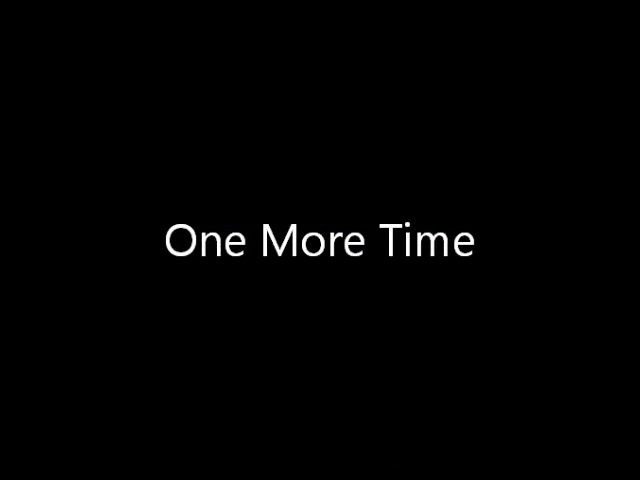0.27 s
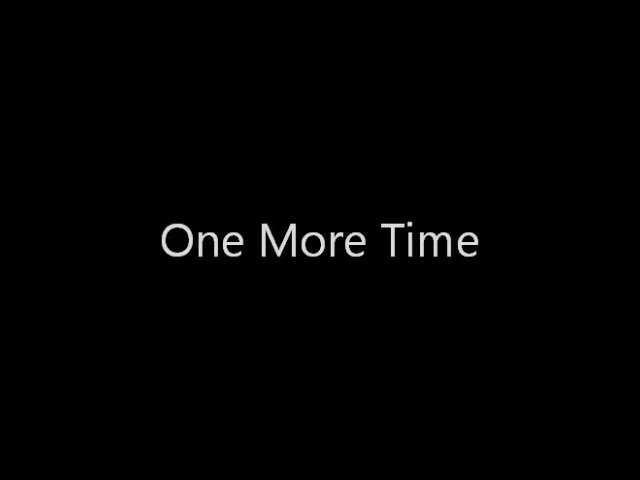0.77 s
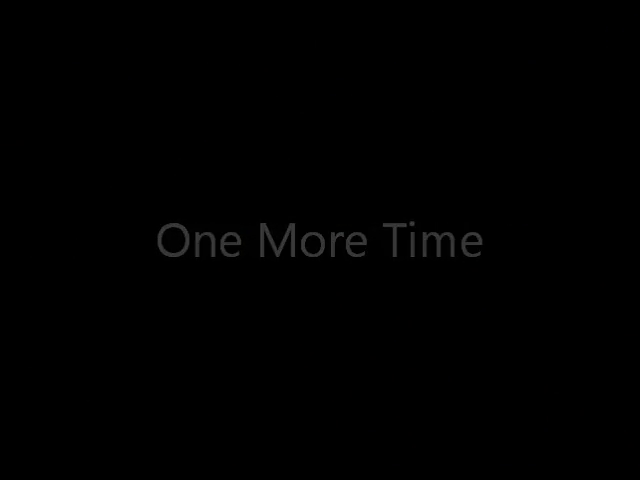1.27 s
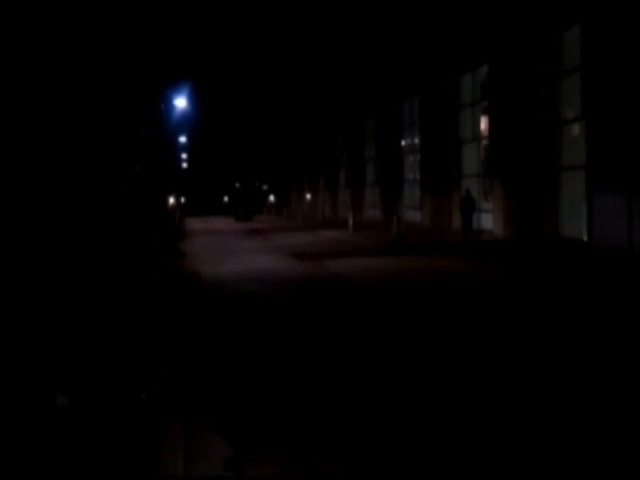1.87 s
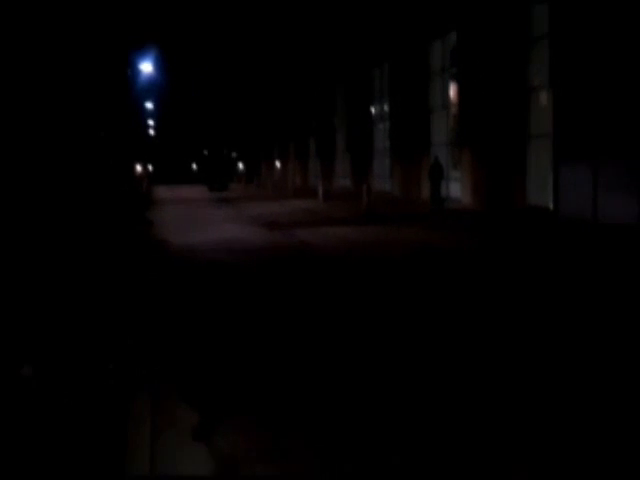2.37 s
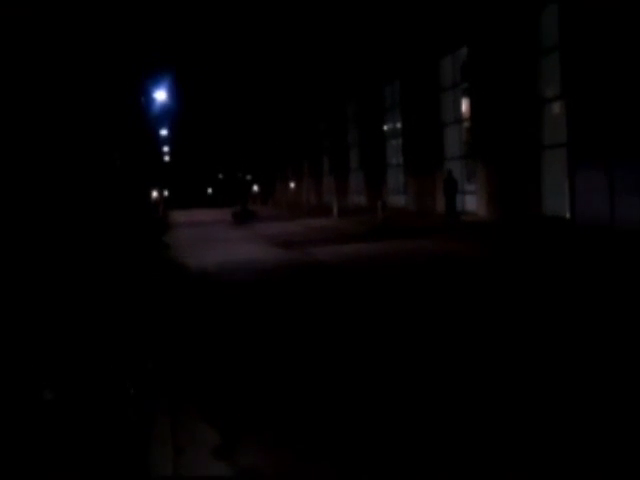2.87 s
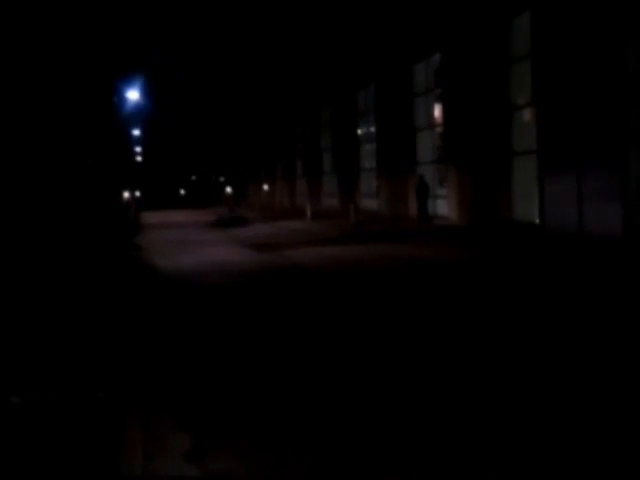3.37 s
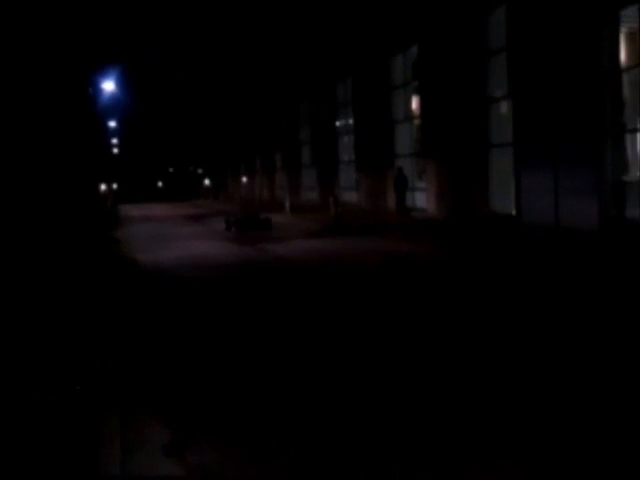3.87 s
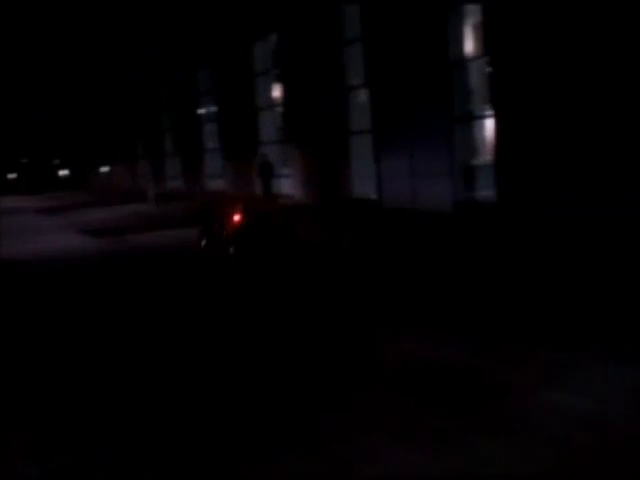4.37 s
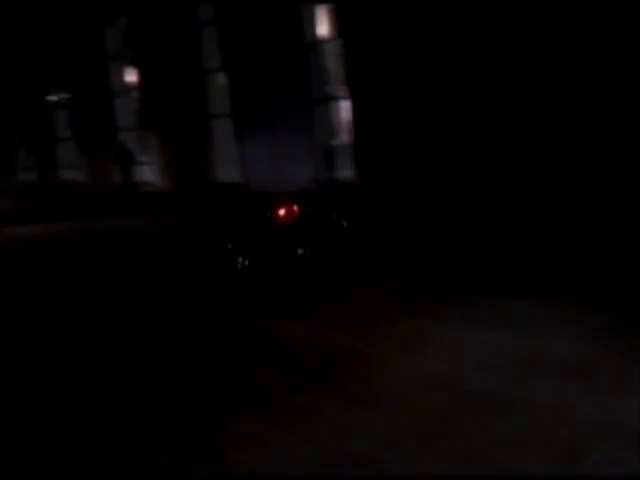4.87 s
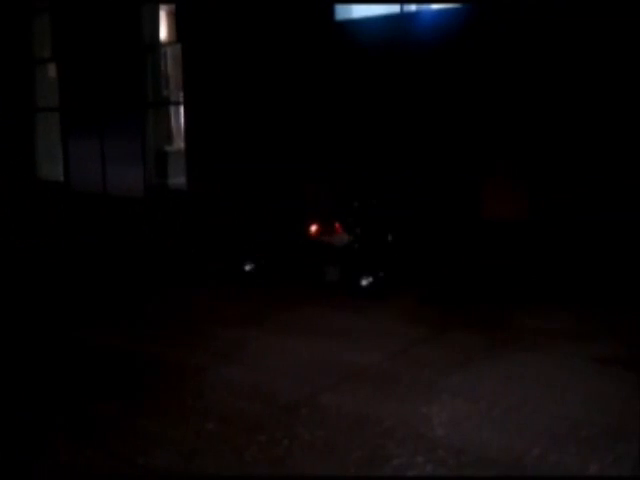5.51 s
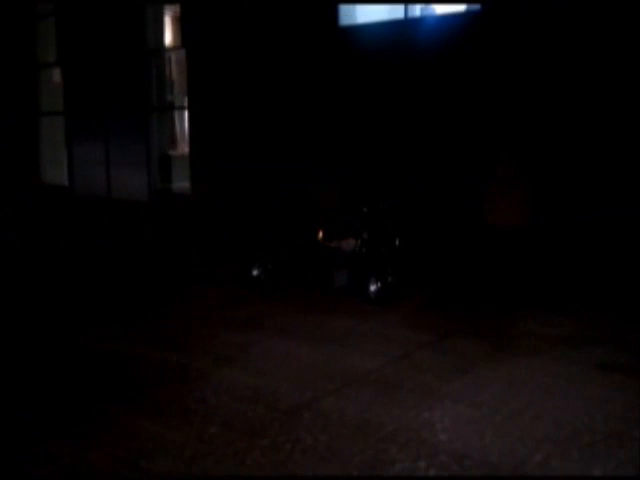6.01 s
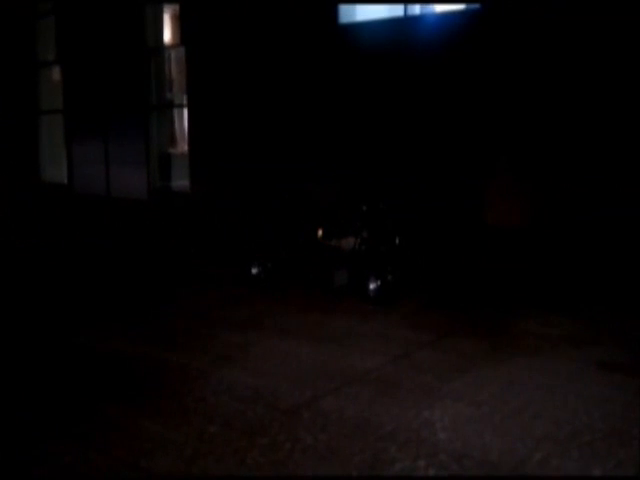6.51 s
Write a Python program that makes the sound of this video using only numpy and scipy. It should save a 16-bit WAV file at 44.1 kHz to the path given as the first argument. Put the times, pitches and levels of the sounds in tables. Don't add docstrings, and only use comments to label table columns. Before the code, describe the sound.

Outdoors between hard walls, one car engine comes nearer, its steady hum rising in pitch and roughness. Loud ragged exhaust and intake roar peak mid-scene, clipping the microphone, with three quick rev surges. Then it comes off throttle, turning side-on, deeper and clattery, briefly blipping. Near the end a tiny metal tick, a last soft rev, and distant traffic wash.

```python
import sys
import numpy as np
from scipy import signal
from scipy.fft import rfft, irfft
from scipy.io import wavfile
from scipy.ndimage import uniform_filter1d, map_coordinates

SR = 44100
rng = np.random.default_rng(int(sys.argv[2]) if len(sys.argv) > 2 else 0)


def generate_wav(signal):
    frames = np.transpose(np.atleast_2d(signal))
    scaled = np.clip(frames, -1, 1) * 32767
    pcm = np.round(scaled).astype(np.int16)
    wavfile.write(sys.argv[1], SR, pcm)


def decibels_to_gain(level_db):
    exponent = np.asarray(level_db, float) / 20
    return 10 ** exponent


N = 297630

# freq_hz, level_db
PIPE_RESONANCE = [(140, -30), (230, -4), (290, -3), (335, -2.5), (388, -0.5), (423, -5), (461, -17),
                  (836, -10.5), (1300, -39.5), (1690, -46), (2860, -120)]


def unit(x):
    return x / np.sqrt(np.mean(x ** 2) + 1e-20)


def along(points, hz):
    freq_hz, value = np.transpose(points)
    return np.interp(np.log(hz + 1), np.log(freq_hz + 1), value)


def curves(rows):
    time_s, *columns = np.transpose(rows)
    return [np.interp(np.arange(N) / SR, time_s, column) for column in columns]


def wobble(rate_hz):
    knots = rng.standard_normal(int(N * rate_hz / SR) + 4)
    return map_coordinates(knots, [np.arange(N) * rate_hz / SR])


def bump(middle_s, length_s):
    phase = np.clip((np.arange(N) / SR - middle_s) / length_s, -.5, .5)
    return np.cos(np.pi * phase) ** 2


def coloured(x, spectrum):
    size = 16384
    gain = decibels_to_gain(along(spectrum, np.fft.rfftfreq(size, 1 / SR)))
    cepstrum = irfft(np.log(gain + 1e-6), size)
    cepstrum[1:size // 2] *= 2
    cepstrum[size // 2 + 1:] = 0
    return signal.fftconvolve(x, irfft(np.exp(rfft(cepstrum)), size))[:N]


def rush(spectrum, patchy_db):
    z = signal.stft(rng.standard_normal(N), nperseg=512)[2]
    field = uniform_filter1d(rng.standard_normal(z.shape), size=8, axis=0)
    field = uniform_filter1d(field, size=6, axis=1)
    noise = signal.istft(z * decibels_to_gain(patchy_db * unit(field)), nperseg=512)[1][:N]
    return unit(coloured(noise, spectrum))


def crankshaft():
    # time_s, cycle_hz
    revs = [(0, 31.77), (.42, 32.71), (.9, 36.18), (1.25, 38.67), (1.5, 42.14), (1.81, 47), (2.07, 52.98),
            (3.4, 53.3), (3.83, 49.08), (4.27, 41.32), (4.57, 38.17), (4.77, 42.08), (5.16, 37.65),
            (5.74, 30.2), (5.9, 29.7), (6.14, 37.2), (6.4, 38.97), (6.75, 34.2)]
    # middle_s, length_s, rise_hz
    flares = [
        (1.656, .3, 6.5),
        (2.345, .6, 14.5),
        (3.002, .6, 6.5),
    ]
    return curves(revs)[0] + sum(rise * bump(s, length) for s, length, rise in flares)


def orders(cycle_hz, drone_db, throttle):
    pulling = [-2, 0.5, -8, -5, -2.5, -5, -13.5, -10]
    coasting = [-14.5, -7.5, -0.5, -1, -6, -8.5, -8, -10]
    # freq_hz, gain_db
    walls = [(30, -15), (42, -4), (58, -1.5), (120, 2), (250, -0.4), (450, -1.5)]
    # middle_s, length_s, freq_hz, gain_db
    standing = [(0.34, 1.1, 65, 1), (0.62, 0.7, 205, 7.5), (0.79, .16, 70, -14), (1.048, 0.82, 75, 5.5),
                (1.111, 1, 188, 4.5), (5.55, .7, 65, -5), (1.85, 0.35, 47, 10), (2.299, 0.1, 130, 10.5),
                (2.44, 0.38, 67, 8.5), (2.706, .3, 108, 3), (2.836, 0.24, 330, 13), (2.916, 0.24, 58, 4),
                (2.992, 0.2, 119, 6.5), (3.11, .2, 172, 10.5), (3.04, .24, 355, 10), (3.35, 0.74, 210, 7),
                (3.948, 0.69, 188, 6.5), (3.758, 2.2, 100, 6.5), (4.374, 0.32, 203, 11.5),
                (4.302, 0.29, 330, 9), (4.65, 0.12, 195, 11), (4.95, .5, 160, 4.5), (4.89, 0.4, 325, 11.5),
                (5.1, 1.2, 115, 4), (5.62, 0.53, 97, 3), (.15, .5, 160, 3), (6.04, 0.28, 165, 11.5),
                (6.241, 0.39, 76, 11), (6.46, 0.26, 146, 13.5), (6.68, 0.14, 70, 12)]
    lift_s, lift_length_s, pickup_s = 3.22, 0.29, 6.0
    t = np.arange(N) / SR
    idling = np.clip((t - pickup_s) / .1 + 1, 0, 1)
    lifted = np.clip((t - lift_s) / lift_length_s + .5, 0, 1) * (1 - idling)
    torn_db = 0.16 * np.clip(cycle_hz - 40, 0, None) * (1 - lifted) + 4 * idling
    levels = []
    for k, (pull, coast) in enumerate(zip(pulling, coasting), 1):
        level_db = drone_db + pull + lifted * (coast - pull) + along(walls, k * cycle_hz)
        level_db = level_db - (k > 2) * torn_db
        cancel_db = 4 * throttle * np.clip(wobble(12), 0, None) ** 2
        levels.append(level_db + 0.82 * wobble(3.02) - cancel_db)
    for s, length, hz, db in standing:
        nearest = int(np.clip(round(hz / cycle_hz[int(s * SR)]), 1, len(levels))) - 1
        levels[nearest] = levels[nearest] + db * bump(s, length)
    return levels


def upper_orders(cycle_hz, bark_db, flank):
    facing_db = bark_db - 11.5 - 6 * flank
    return [facing_db + along(PIPE_RESONANCE, k * cycle_hz) + 1.5 * wobble(7.6) for k in range(9, 14)]


def drone(turns, order_db):
    total = np.zeros(N)
    for k, db in enumerate(order_db, 1):
        scatter = 0.63 * wobble(2.005) + 0.13 * wobble(14)
        sine = np.sin(2 * np.pi * (k * turns + rng.uniform()) + scatter)
        total += np.sqrt(2) * decibels_to_gain(db + 1.43 * wobble(13) + 0.47 * wobble(16)) * sine
    return total


def alley(x):
    # freq_hz, t60_s
    decay = [(60, 0.61), (500, 0.39), (3000, 0.14)]
    hz, t, z = signal.stft(rng.standard_normal(SR // 2), SR, nperseg=256)
    tail = signal.istft(z * decibels_to_gain(-60 * t / along(decay, hz)[:, None]), SR, nperseg=256)[1]
    return signal.fftconvolve(x, tail / np.linalg.norm(tail))[:N]


def bark(turns, jitter_s, scatter_db):
    at = np.flatnonzero(np.diff(np.floor(turns)))
    chance = rng.standard_normal((len(at), 2))
    at = np.clip(at + np.round(jitter_s * SR * chance[:, 0]).astype(int), 0, N - 1)
    pulses = coloured(np.bincount(at, decibels_to_gain(scatter_db * chance[:, 1]), N), PIPE_RESONANCE)
    return unit(pulses + decibels_to_gain(3) * alley(pulses))


def smear(gas, hum, throttle):
    # freq_hz, level_db per Hz
    rumble = [(15, -41), (25, -16.5), (75, -1.5), (141, 1.5), (285, -5.5), (547, -19), (600, -13.5),
              (780, -58.5), (1320, -120)]
    smear_db = -21.5 + .3 * gas + 0.51 * hum + 1.5 * throttle
    return decibels_to_gain(smear_db) * rush(rumble, patchy_db=1.5)


def intake_roar(rasp_db, stab_db, throttle, puff):
    # freq_hz, level_db per Hz
    roar = [(300, -31.5), (450, 0), (590, -6.5), (680, -3.5), (790, -2), (940, -3.5), (1080, -8.5),
            (1200, -20), (1750, -17.5), (2500, -34.5), (4200, -120)]
    roar_db = rasp_db - 0.4 + 11 * throttle + 0.062 * stab_db + 1.0 * wobble(11)
    return decibels_to_gain(roar_db + 1.4 * puff) * rush(roar, patchy_db=1.16)


def below_edge(x):
    return signal.sosfiltfilt(signal.cheby2(10, 30, 8030, fs=SR, output="sos"), x)


def gas_rasp(rasp_db, flank, puff):
    # freq_hz, level_db per Hz
    hiss = [(530, -23), (900, -11.5), (1200, -13), (1520, -8.5), (2000, -13), (2500, -10), (2800, -17.5),
            (3090, -13.5), (3560, -19), (6280, -31.5), (7500, -49), (9750, -89.5), (16500, -120)]
    # freq_hz, level_db per Hz
    clatter = [(530, -31.5), (900, -9), (1070, -8.5), (1180, -2), (1750, -7), (2110, -4), (2630, -11),
               (2980, -6), (3470, -11.5), (4650, -13.5), (5900, -19.5), (6510, -22), (7500, -38),
               (9750, -71.5), (16500, -120)]
    noise = np.sqrt(1 - flank) * rush(hiss, patchy_db=1.0) + np.sqrt(flank) * rush(clatter, patchy_db=0.5)
    level_db = rasp_db - 0.5 + 0.62 * puff + 0.38 * wobble(11) + .6 * wobble(60)
    return decibels_to_gain(level_db) * below_edge(noise)


def valve_sizzle(rasp_db, flank):
    # freq_hz, level_db per Hz
    whistle = [(4880, -47), (8300, -12.5), (8610, -0.5), (9280, 4), (10800, -7.5), (14000, -43),
               (22000, -120)]
    return decibels_to_gain(rasp_db - 40.5 + 4.2 * flank) * rush(whistle, patchy_db=3.0)


def tick():
    # start_s, peak_db, pitch_hz
    ring = [
        (5.8225, -27, 5706),
    ]
    (start_s, peak_db, pitch_hz), = ring
    t = np.clip(np.arange(N) / SR - start_s, 0, None)
    envelope = decibels_to_gain(peak_db - 60 * t / 0.013) * (1 - np.exp(-t / 0.0011))
    return envelope * np.sin(2 * np.pi * pitch_hz * t)


def street():
    # freq_hz, level_db per Hz
    far_wash = [(300, -42.5), (550, -6), (850, 0.5), (1100, 0), (1500, -5), (1900, -11.5), (2300, -24.5),
                (3000, -63), (5000, -120)]
    # freq_hz, level_db per Hz
    ground = [(15, -28), (30, -5), (55, -3.5), (110, -6.5), (250, -32), (600, -120)]
    # time_s, level_db
    wash_level = [(0, -55), (6, -51), (6.3, -45), (6.75, -39.5)]
    noise = rush(far_wash, patchy_db=3.0) + decibels_to_gain(5) * rush(ground, patchy_db=3.0)
    return decibels_to_gain(curves(wash_level)[0]) * noise


def scene():
    # time_s, gas_db as heard, drone_db, throttle 0-1
    path = [(0, -48, -29, 0), (.3, -40.5, -26, 0.22), (.9, -39.5, -22.5, 0.42), (1.4, -34, -22, 0.88),
            (1.9, -34, -21, 1.05), (2.17, -27.5, -22, .9), (2.5, -27.5, -21, 0.69), (2.78, -27.5, -18.5, 1),
            (3.3, -28, -21.5, 0.62), (3.85, -30.5, -20.5, 0), (4.3, -31, -21, 0.2), (4.8, -33, -20.5, .35),
            (5.15, -36, -23, .05), (5.5, -38, -22.5, .01), (5.82, -41, -25, 0), (5.97, -43.5, -27.5, 0.35),
            (6.35, -43, -34, .3), (6.75, -49, -34, .7)]
    # middle_s, length_s, gain_db
    stabs = [(0.373, 0.13, 4.5), (0.683, 0.48, 5), (0.972, .14, 2.5), (1.32, 0.075, -1),
             (1.512, 0.084, 2.5), (1.678, .14, 3), (2.314, 0.32, 5), (2.627, 0.24, 3.5), (2.989, 0.42, 5),
             (3.636, 0.21, 1.5), (4.115, 0.36, 1.5), (4.8, 0.21, 0.5), (5.32, 0.19, 1.5),
             (5.991, 0.58, 5.5)]
    # time_s, share 0-1
    turning = [(0, 0.24), (3, 0.11), (3.6, 0.37), (5, 0.97), (6.75, 1)]
    cycle_hz = crankshaft()
    turns = np.cumsum(cycle_hz) / SR
    puff = np.cos(2 * np.pi * turns)
    gas_db, drone_db, throttle = curves(path)
    stab_db = sum(db * bump(s, length) for s, length, db in stabs)
    flank = np.clip(curves(turning)[0], 0, 1)
    gas, hum = gas_db - gas_db.mean(), drone_db - drone_db.mean()
    rasp_db = gas_db + stab_db
    bark_db = -21 + 0.37 * gas + 0.28 * hum + 0.38 * stab_db + 7 * throttle
    bark_db = bark_db - 3 * flank + 1.9 * wobble(9)

    order_db = orders(cycle_hz, drone_db, np.clip(throttle, .1, 1))
    order_db += upper_orders(cycle_hz, bark_db, flank)
    engine = drone(turns, order_db)
    engine += decibels_to_gain(bark_db - 6 - 3.9 * flank) * bark(turns, jitter_s=0.00034, scatter_db=4.0)
    engine += smear(gas, hum, throttle)
    engine += intake_roar(rasp_db, stab_db, throttle, puff)
    engine += gas_rasp(rasp_db, flank, puff)
    engine += valve_sizzle(rasp_db, flank)
    return (engine + tick() + street())[None]


def low_pass(x):
    return signal.sosfilt(signal.butter(12, 15710, fs=SR, output="sos"), x)


def record(dry):
    # time_s, ceiling
    fade = [(0, .28), (.5, .42), (.85, .5), (1.1, .55), (2.1, .64), (3.3, .64), (4.5, .56), (4.75, .52),
            (5.4, .42), (6.75, .2)]
    top, hard_ceiling = curves(fade)[0], .497
    x = decibels_to_gain(1.5) * dry
    rounded = x / (1 + np.abs(x / top) ** 9) ** (1 / 9)
    excess = below_edge(rounded - x)
    offset = -.075 * np.sqrt(np.abs(uniform_filter1d(x ** 2, size=8000)))
    end_ramps = np.clip(np.minimum(np.arange(N, 0, -1) / 60, np.arange(N) / 40), 0, 1)
    return low_pass(end_ramps * np.clip(x + excess + offset, -hard_ceiling, hard_ceiling))


dry = scene()
out = record(dry)
generate_wav(out)
```